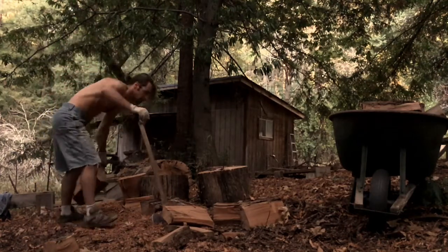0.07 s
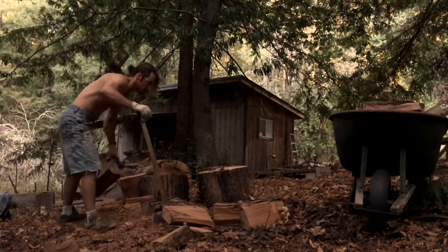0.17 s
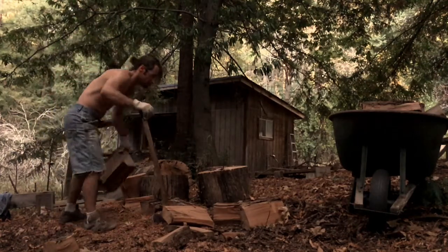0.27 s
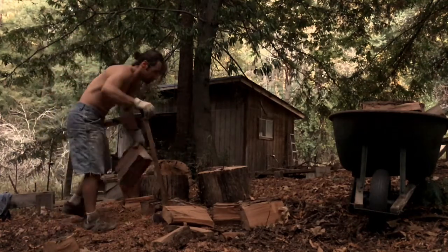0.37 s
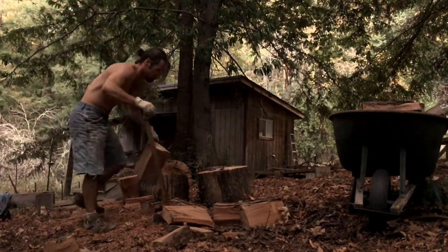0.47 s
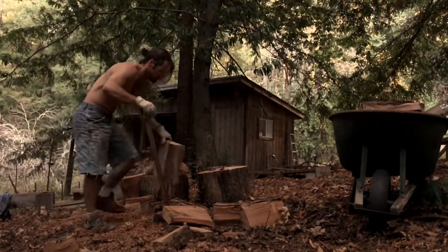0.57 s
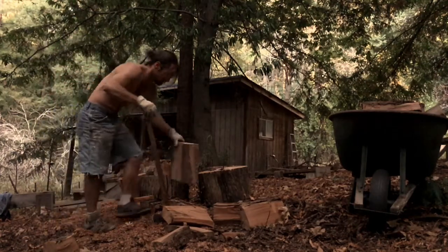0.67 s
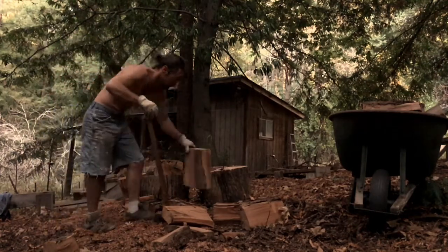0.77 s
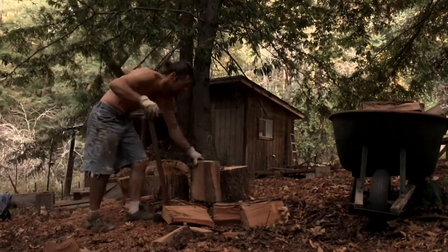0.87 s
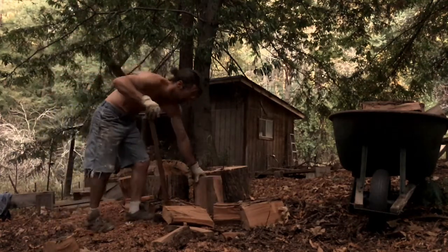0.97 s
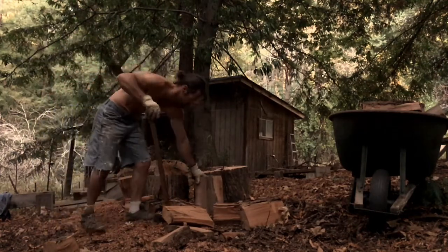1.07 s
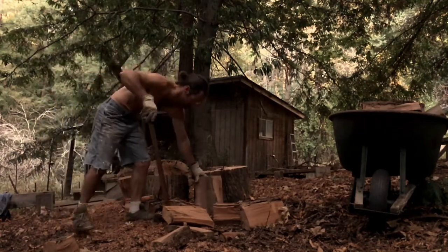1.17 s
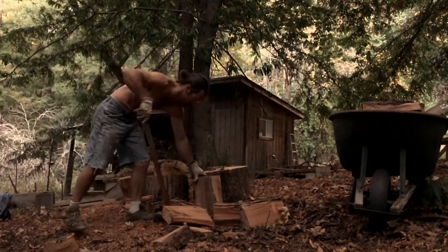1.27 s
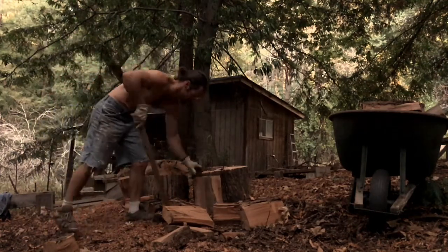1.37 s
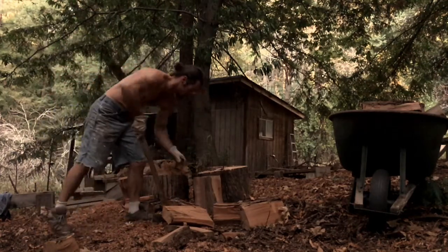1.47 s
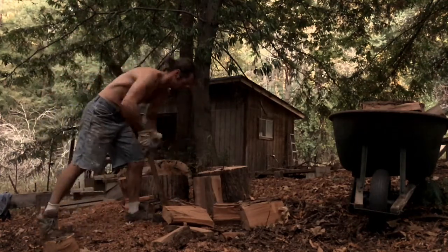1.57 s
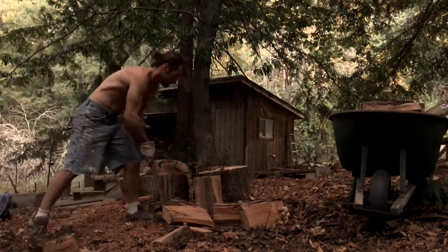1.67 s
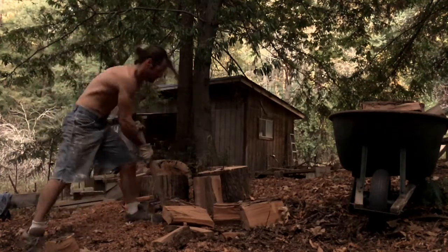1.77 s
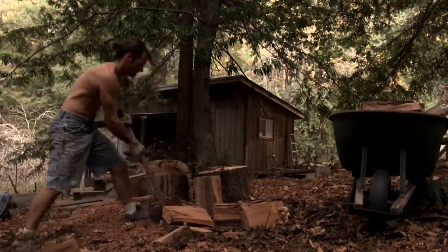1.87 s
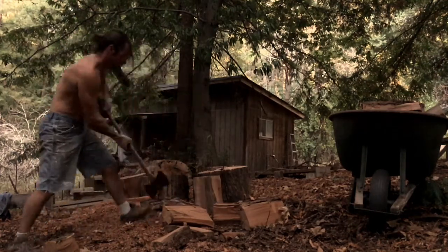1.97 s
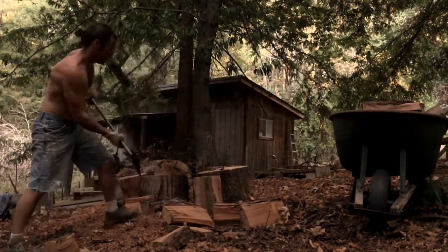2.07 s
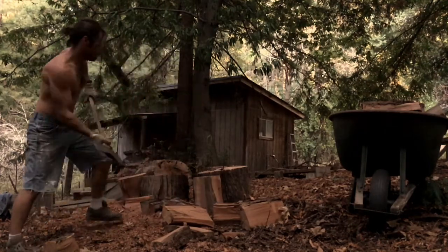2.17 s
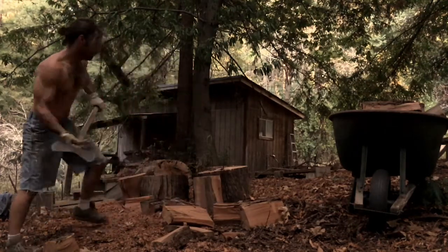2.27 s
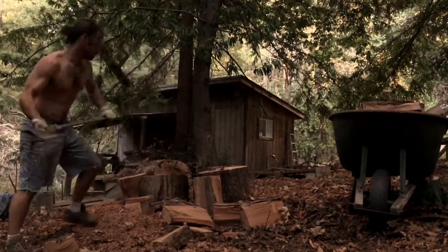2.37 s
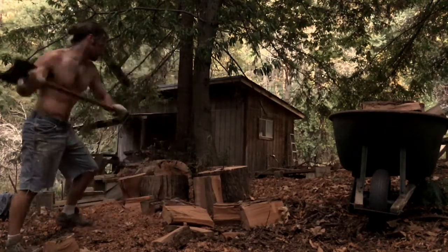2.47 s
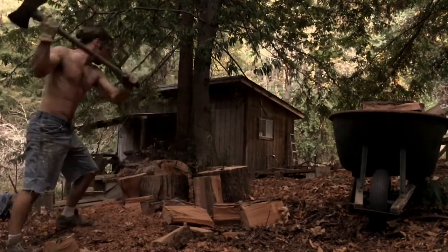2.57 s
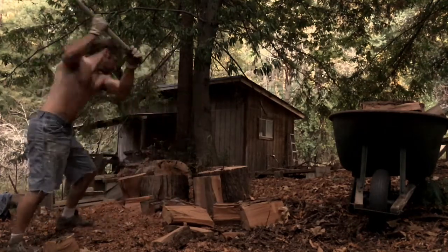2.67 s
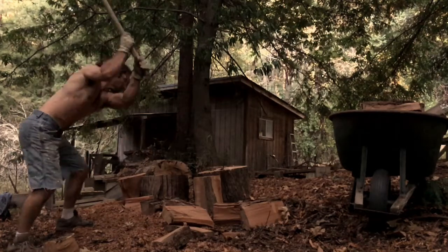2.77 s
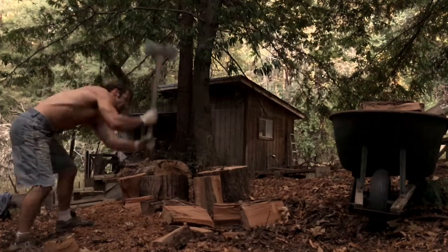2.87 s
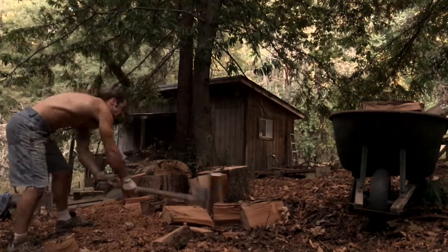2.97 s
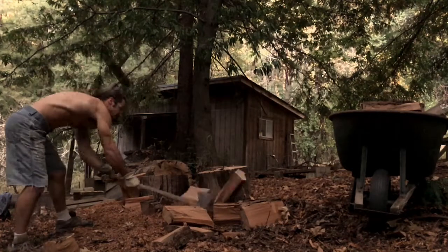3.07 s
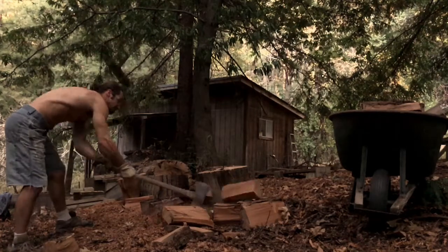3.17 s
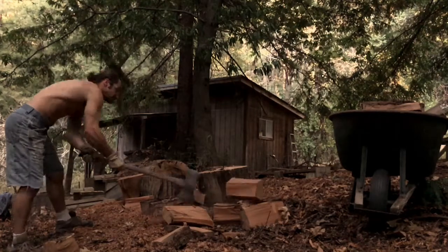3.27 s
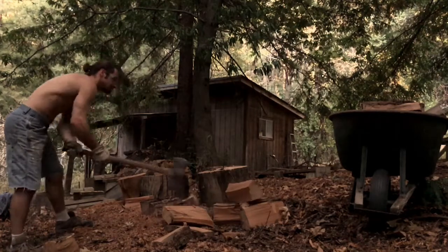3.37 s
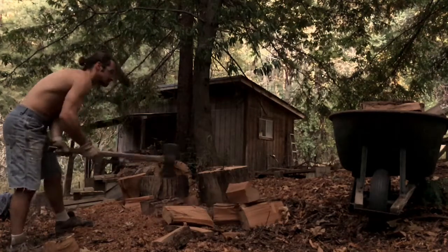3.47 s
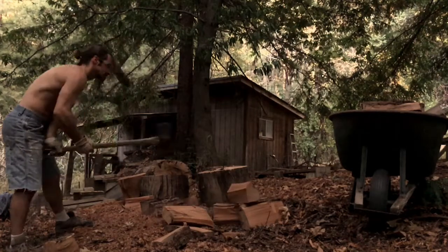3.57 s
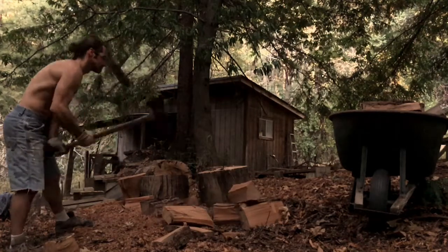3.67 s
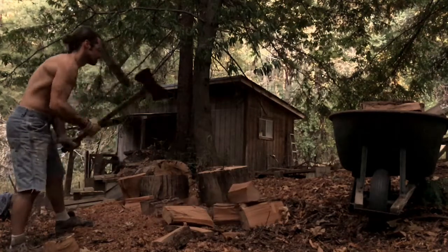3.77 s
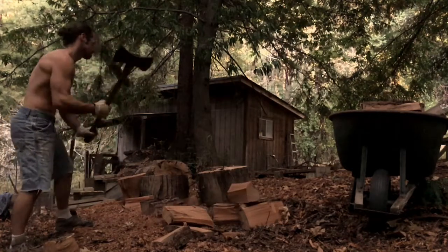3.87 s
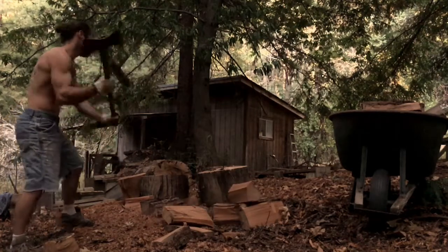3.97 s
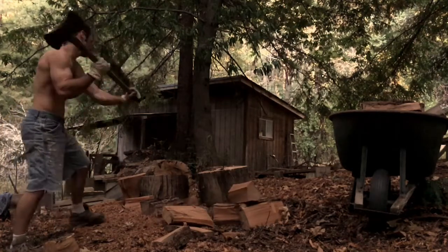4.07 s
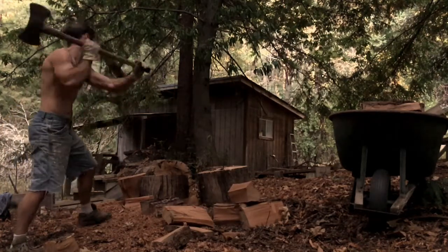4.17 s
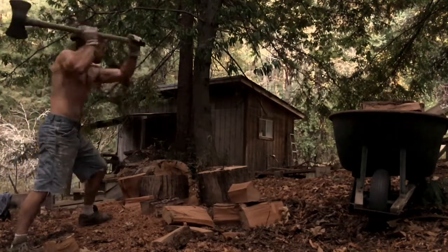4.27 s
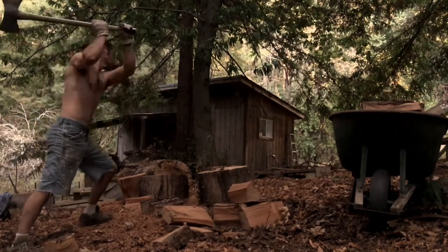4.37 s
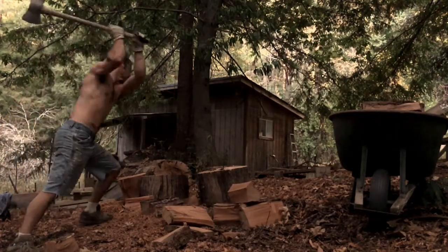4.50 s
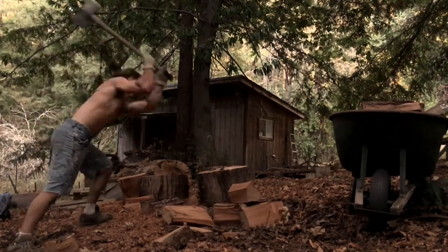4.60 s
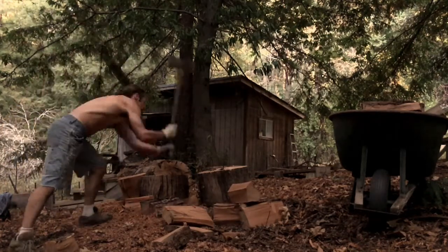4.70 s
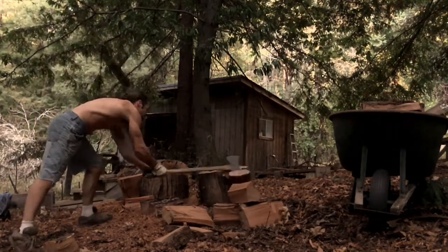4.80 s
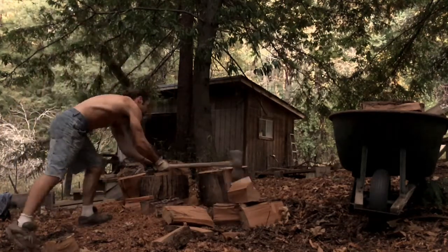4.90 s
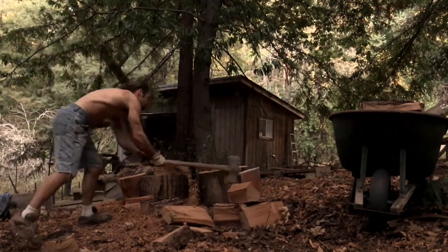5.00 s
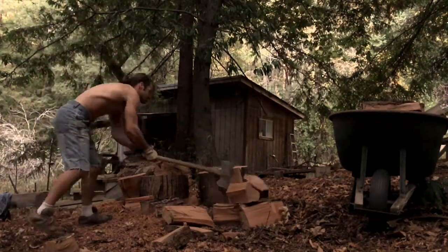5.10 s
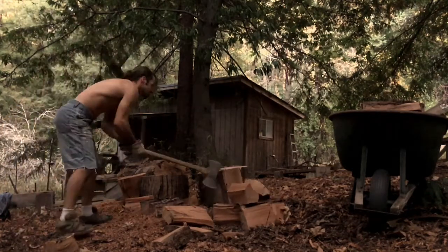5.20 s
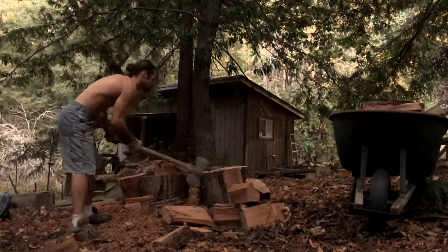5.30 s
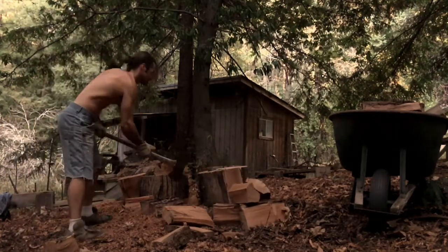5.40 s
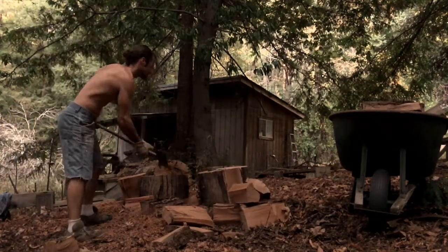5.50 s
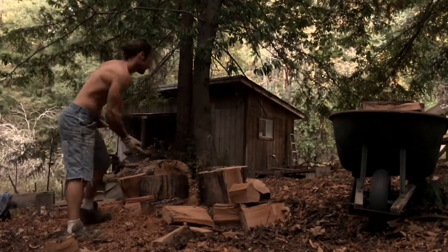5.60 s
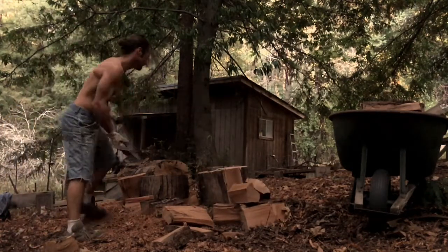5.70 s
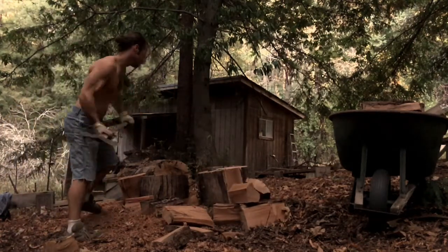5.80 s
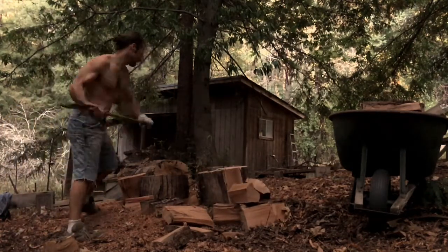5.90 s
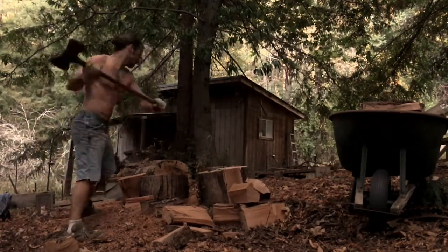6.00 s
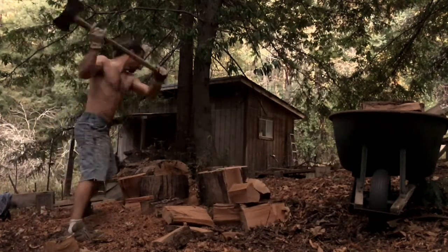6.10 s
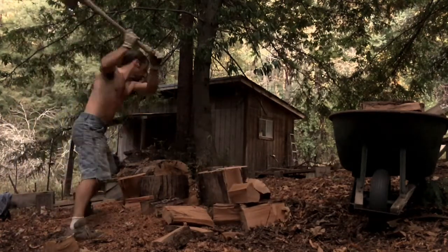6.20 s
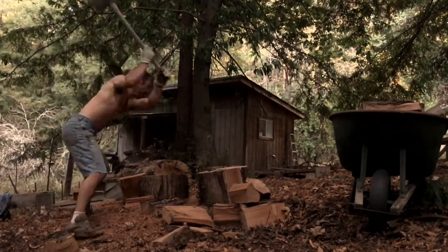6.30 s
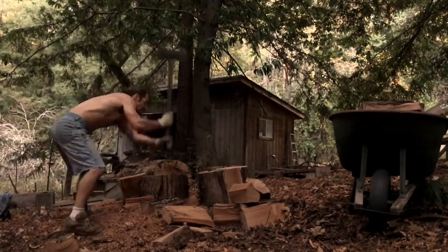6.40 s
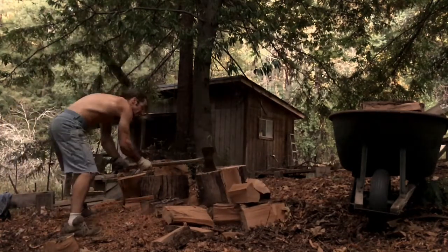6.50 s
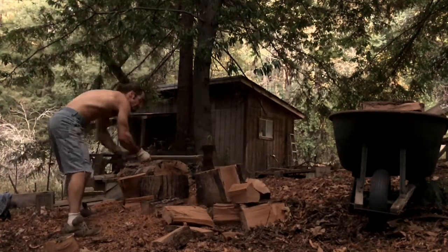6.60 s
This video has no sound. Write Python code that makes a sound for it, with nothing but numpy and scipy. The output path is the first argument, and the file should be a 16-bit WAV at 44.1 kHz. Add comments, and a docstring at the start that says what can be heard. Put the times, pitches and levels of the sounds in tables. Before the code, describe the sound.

Three cracking axe blows on wood echo through a forest, amid tumbling split pieces, brief steel rings and footsteps in leaves.

```python
"""Splitting firewood in the woods

An axe at a chopping block, on one microphone. Each of three chops swishes, cracks the log and thumps
the ground; the first two ring the steel head, and a shed throws that ring back. Split pieces fall and
knock, feet and logs rustle dry leaves, and the wood echoes off nearby trees and a far slope.
Far off, a bird hoots over a low, steady rumble."""
import sys
import numpy as np
from scipy import signal
from scipy.fft import rfft, irfft, next_fast_len
from scipy.io import wavfile
from scipy.ndimage import uniform_filter1d, map_coordinates

SR = 44100
rng = np.random.default_rng(int(sys.argv[2]) if len(sys.argv) > 2 else 0)


def store_wav(level_fs):
    """Save 16-bit WAV to argv[1]."""
    pcm = np.round(np.clip(np.atleast_2d(level_fs), -1, 1) * 32767)
    wavfile.write(sys.argv[1], SR, pcm.T.astype(np.int16))


N = 293265


def amp(db):
    """Decibels to gain."""
    return 10 ** (np.asarray(db) / 20)


def unit(x):
    """Scale to rms 1."""
    return x / np.sqrt(np.mean(x ** 2) + 1e-20)


def along(points, hz, column=1):
    """Read one column of (Hz, value, ..) points along a log frequency axis."""
    cols = np.transpose(points)
    return np.interp(np.log(hz + 1), np.log(cols[0] + 1), cols[column])


def curves(rows):
    """One value per sample for each column after the time."""
    times, *cols = np.transpose(rows)
    return [np.interp(np.arange(N) / SR, times, col) for col in cols]


def filtered(x, response):
    """Filter x by a response given as a function of frequency."""
    size = next_fast_len(N + SR // 2)
    return irfft(rfft(x, size) * response(np.fft.rfftfreq(size, 1 / SR)), size)[:N]


def coloured(x, response):
    """Filter scaled so that white noise keeps its rms."""
    hz = np.linspace(0, SR / 2, num=4096)
    return filtered(x, response) / np.sqrt(np.mean(np.abs(response(hz)) ** 2))


def shape(points):
    """Response through (Hz, dB) points."""
    return lambda hz: amp(along(points, hz))


def modes(table):
    """Causal response of a set of resonances, alternating in sign."""
    return lambda hz: sum((-1) ** k * amp(db) * 1j * hz * width / (centre**2 - hz**2 + 1j * hz * width)
                          for k, (centre, width, db) in enumerate(table))


def add(track, start, sound):
    """Mix a sound in at a start time in seconds."""
    part = track[round(start * SR):][:len(sound)]
    part += sound[:len(part)]


def fading(t, t60, rise):
    """Quick rise, then exponential decay."""
    return amp(-60 * t / t60) * (1 - np.exp(-t / rise))


def swell(peak_s, hold, rise, fall):
    """Gain that climbs to 1 at peak_s, holds and sinks; rise and fall are seconds per 30 dB."""
    now = np.arange(N) / SR
    return amp(-30 * np.maximum(0, np.maximum((peak_s - now) / rise, (now - peak_s - hold) / fall)))


def grainy(share, spread_db, clump_db):
    """Noise with sparse spikes of uneven size, coming in clumps; rms 1."""
    chance, size = rng.random((2, N))
    spikes = (chance < share) * amp(np.minimum(-spread_db * np.log(1 - size), 14))
    knots = rng.standard_normal(N // 1000 + 4)  # 23 ms apart
    clumps = amp(clump_db * map_coordinates(knots, [np.arange(N) / 1000]))
    return unit(clumps * (1 + 8 * uniform_filter1d(spikes, size=20)) * rng.standard_normal(N))


def wood_knocks():
    """At each contact fibres tear, the log resonates with two notes and a soft push moves the block."""
    # Blows and falling pieces. Each row: start in seconds, crack in dB, pitch of the piece in Hz,
    # then low note, high note and block in dB. Levels are relative within a column.
    contacts = [(0.796, -26.5, 1220, -77, -70, -77), (0.8716, -44, 550, -54, -62, -61),
                (1.028, -47, 1030, -51, -55, -76), (1.039, -29, 1155, -40, -46.5, -56),
                (1.0442, -29, 1060, -41, -50, -55), (1.0491, -31, 1150, -66, -59, -56),
                (1.193, -46.5, 1060, -76, -65, -84), (1.4282, -67, 850, -65, -67, -74),
                (1.459, -64, 955, -57, -74, -80), (1.796, -38, 1080, -64, -56, -81),
                (1.9524, -56, 560, -57, -74, -60), (2.0614, -51, 910, -55.5, -73, -63),
                (2.0874, -45, 880, -58.5, -68, -63), (2.1304, -62, 1090, -53, -83, -87),
                (2.568, -50, 1470, -65, -64.5, -73), (2.92, -62, 890.6, -58, -61, -64.5),
                (3.0398, 1, 1056, -8, -16, -22), (3.0434, -4.5, 1064, -19.5, -15.5, -36.5),
                (3.0509, -25, 1300, -32.5, -18.5, -26), (3.0634, -18, 1400, -19.5, -26, -20),
                (3.0694, -4.5, 1296, -10.5, -9.5, -19), (3.093, -24, 1100, -36.5, -40, -29),
                (3.1974, -32.5, 1320, -65, -63, -43), (3.2376, -24, 970, -32, -31.5, -37.5),
                (3.2469, -23.5, 1360, -25.5, -29, -39), (3.3308, -41, 1020, -46, -37.5, -75),
                (3.34, -32, 1180, -48, -31.5, -57), (3.349, -42, 1170, -42, -39, -57),
                (3.4739, -47, 627, -78, -69, -42), (4.176, -58.5, 1537, -77, -60, -75),
                (4.2659, -51, 1075, -73, -56.5, -79), (4.2885, -50, 1080, -70, -56, -80),
                (4.4516, -47, 968, -65, -55, -82), (4.461, -50, 964, -67, -57.5, -73.5),
                (4.574, -53.5, 1050, -65, -59.5, -71), (4.8681, -4.5, 692, -8.5, -18.5, -8.5),
                (4.871, -34, 330, -13, -16, -10.5), (4.878, -31, 850, -19.5, -35.5, -18),
                (4.8845, -9.5, 400, -13.5, -19, -18.5), (4.8862, -13, 1650, -29.5, -21, -28),
                (4.9442, -38.5, 950, -35.5, -37, -45), (5.1017, -14, 1330, -49, -31, -36),
                (5.2099, -11, 1287, -38.5, -20, -30.5), (5.2276, -27, 1160, -52, -32, -44),
                (5.2426, -33, 555, -40.5, -54, -41.5), (5.326, -28.5, 1480, -43, -58, -73.5),
                (5.337, -36, 1750, -73, -46, -72), (5.612, -63, 689, -52, -72, -59.5),
                (5.8325, -48, 681, -60.5, -63, -71), (6.575, -1, 1117, -12.5, -7, -11),
                (6.5779, -17, 1195, -34, -18, -21), (6.5849, -28, 637, -18.5, -41, -21)]
    # Spectrum of tearing fibres. Each row: frequency in Hz, gain in dB.
    fibre_spectrum = [(1470, -30), (2500, -11.5), (3430, -11), (4780, -4.5), (6920, -1), (9270, -4.5),
                      (10300, -9.5), (15200, -19), (16500, -36.5)]
    # Resonances of the log and the chopping block. Each row: centre in Hz, width in Hz, gain in dB.
    log_modes = [(845, 710, 1), (1124, 410, 6), (1629, 220, 1.5), (2140, 320, 3), (2540, 72, 2),
                 (3330, 500, -3)]
    block_modes = [(190.5, 130, -2), (245, 76, 3.5), (370, 53, 2), (670, 31, 4)]
    tear_t60, rebound_s, rebound_db = 0.013, 0.004, -12.5
    crack, knock, notes, push = np.zeros((4, N))
    t = np.arange(SR // 4) / SR
    tear = fading(t, tear_t60, rise=0.0032) + 0.6 * fading(t, 0.0035, rise=0.0009)  # a sharp snap leads
    drive = fading(t, 1.394 * tear_t60, rise=0.0011)
    shove = fading(t, t60=0.013, rise=0.00058)
    for start, crack_db, hz, low_db, high_db, block_db in contacts:
        for landing, gain in ((start, 1), (start + rebound_s, amp(rebound_db))):  # it lands twice
            crack_noise, log_noise = rng.standard_normal((2, len(t)))
            add(crack, landing, gain * amp(crack_db) * tear * crack_noise)
            add(knock, landing, gain * amp((low_db + high_db) / 2 + 8) * drive * log_noise)
            add(push, landing, -gain * amp(block_db + 20.5) * shove)
        low = amp(low_db + 7) * np.sin(2 * np.pi * hz * t)
        high = amp(high_db + 7) * np.sin(2 * np.pi * 1.9 * hz * t)
        add(notes, start, fading(t, tear_t60, rise=0.00072) * (low + high))
    log = coloured(crack, shape(fibre_spectrum)) + coloured(knock, modes(log_modes)) + notes
    return log + filtered(push, modes(block_modes))


def ground_thumps():
    """Under a blow or a falling log the soil swings a few times at a low pitch and is soon damped."""
    # Heaves of the ground. Each row: start in seconds, level in dB, pitch in Hz, length in seconds.
    heaves = [(1.055, -32, 125, 0.016), (1.071, -32.5, 77, 0.055), (1.748, -54, 68, 0.039),
              (3.044, -19.5, 115.7, 0.073), (3.056, -27, 70.2, 0.11), (3.252, -39.5, 61.5, 0.06),
              (3.481, -37, 71.6, 0.048), (4.859, -31, 116, 0.028), (4.892, -31.5, 68, 0.076),
              (5.016, -39, 77.4, 0.045), (5.223, -42, 73, 0.092), (6.575, -5.5, 125, 0.016),
              (6.58, -18.5, 70.4, 0.048)]
    out, t = np.zeros(N), np.arange(SR // 2) / SR
    for start, db, hz, length in heaves:
        envelope = (1 - np.exp(-t / 0.0024)) * np.exp(-3 * (t / length) ** 2)
        add(out, start, amp(db) * envelope * np.sin(2 * np.pi * hz * t))
    return out


def axe_head():
    """The struck steel head rings in four short modes and two long ones."""
    # Short modes of the steel. Each row: pitch in Hz, t60 in seconds.
    short_modes = [(2056, 0.21), (5238, 0.83), (6755, 0.049), (7775, 0.048)]
    # Blows on the head. Each row: start in seconds, then the level of each short mode in dB.
    blows = [(3.07, -67.5, -78.5, -22.5, -19.5), (4.870, -22.5, -46.5, -43.5, -40)]
    # Long modes, of the first chop and the second. Each row: time in seconds, direct rms level in dB.
    high_ring = [(3.077, -33), (3.095, -33.5), (3.15, -38.5), (3.2, -52), (3.3, -53), (3.42, -79)]
    low_ring = [(4.885, -36), (4.9, -32.5), (4.96, -44.5), (5.19, -44.5), (5.519, -58), (5.6, -68.5),
                (5.8, -70.5), (5.96, -75.5), (6.3, -86)]
    out, t = np.zeros(N), np.arange(SR // 2) / SR
    for start, *levels_db in blows:
        for (hz, t60), db in zip(short_modes, levels_db):
            add(out, start, amp(db) * fading(t, t60, rise=0.0027) * np.sin(2 * np.pi * hz * t))
    return out + moving_ring(high_ring, hz=4795) + moving_ring(low_ring, hz=2436)


def moving_ring(levels, hz):
    """A long mode and its echo off the shed shift in pitch and beat as the head is drawn back."""
    # Travel of the head. Each row: time in seconds, approach to the microphone in metres,
    # extra path of the echo in metres.
    head_path = [(3.095, 0, 0), (3.15, 0, .036), (3.195, 0, .107), (3.27, 0, .179), (3.42, 0, .29),
                 (4.87, 0, .282), (5.19, 0, .634), (5.27, .03, .775), (5.405, .13, 1.057),
                 (5.485, .2, 1.198), (5.54, .29, 1.339), (5.575, .35, 1.48), (5.69, .35, 1.621),
                 (5.86, .4, 1.762), (5.96, .3, 1.903), (6.3, -.5, 2.25)]
    sound_m_per_s, shed_gain = 343, 0.65
    now = np.arange(N) / SR
    first, last = levels[0][0], levels[-1][0]
    gate = np.interp(now, [first - 0.005, first, last, last + 0.05], [0, 1, 1, 0])
    nearer_m, extra_m = curves(head_path)
    direct = np.sin(2 * np.pi * hz * (now + nearer_m / sound_m_per_s))
    echo = np.sin(2 * np.pi * hz * (now + (nearer_m - extra_m) / sound_m_per_s))
    return np.sqrt(2) * gate * amp(curves(levels)[0]) * (direct + shed_gain * echo)


def swish():
    """Air rushes ever louder round the falling head and stops at the blow."""
    # The moment of each chop in seconds.
    chop_times = [3.04, 4.868, 6.575]
    # Spectrum of the rushing air. Each row: frequency in Hz, gain in dB.
    rush_spectrum = [(150, -29.5), (400, 3), (1500, -7), (4000, -12.5), (9000, -12), (16000, -30)]
    rush = sum(swell(chop, hold=0, rise=0.2, fall=0.01) for chop in chop_times)
    return amp(-56) * coloured(rush * rng.standard_normal(N), shape(rush_spectrum))


def leaf_litter():
    """Dry litter crunches under feet, logs and chips; single twigs, leaves and splinters snap."""
    # Stirs of the litter. Each row: peak time, hold, rise and fall in seconds,
    # then relative crisp and dull levels in dB.
    rustles = [(0.0, .01, .01, 0.16, -72.5, -76.5), (0.245, 0.026, 0.12, 0.062, -53, -69),
               (0.33, 0.18, 0.16, .5, -68.5, -80.5), (0.792, 0.025, 0.027, 0.15, -51, -63.5),
               (0.93, 0.0076, 0.034, 0.16, -64, -67.5), (1.04, 0.0067, 0.047, 0.38, -60.5, -66),
               (1.55, 0.2, 0.9, .3, -76, -76.5), (1.81, 0.13, 0.025, 0.44, -60, -66.5),
               (2.045, .12, .2, 0.24, -63, -67.5), (2.32, 0.015, 0.054, 0.22, -72, -72.5),
               (2.26, 0.0054, .15, 0.08, -63.5, -74), (2.5, 0.43, 0.062, 0.14, -66, -75),
               (2.916, 0.012, 0.14, 0.1, -64, -68.5), (3.09, 0.0073, .02, 0.11, -47, -49),
               (3.23, 0.25, 0.64, 0.25, -56.5, -58), (3.6, 0.17, .1, 0.11, -71, -72.5),
               (4.01, 0.012, 0.25, 0.09, -64.5, -71), (4.271, 0.046, 0.15, 0.12, -71, -74),
               (4.357, 0.082, 0.11, 0.11, -69, -76.5), (4.457, 0.037, 0.042, 0.12, -75, -73),
               (4.547, .05, 0.047, 0.24, -79.5, -75), (4.785, .05, 0.15, 0.12, -71, -76),
               (4.89, 0.005, .02, 0.074, -43.5, -44), (5.018, 0.0066, 0.17, 0.27, -51.5, -54),
               (5.1, 0.17, 0.16, 0.19, -76, -58.5), (5.33, 0.0078, .6, 0.38, -53, -61.5),
               (5.467, 0.14, 0.21, 0.34, -61.5, -70.5), (5.72, 0.16, .1, 0.13, -73, -77.5),
               (6.044, .01, 0.17, 0.59, -65, -70), (6.22, .01, 0.048, 1.04, -66, -79.5),
               (6.4, 0.14, .1, 0.24, -66.5, -78), (6.561, 0.037, 0.025, .15, -54, -48.5)]
    # Single snaps. Each row: start in seconds, relative level in dB, t60 in seconds.
    snaps = [(0.2234, -36, 0.0096), (0.2497, -28, 0.0067), (0.2798, -17.5, 0.003), (0.2994, -44, 0.0082),
             (0.4543, -31.5, 0.0045), (0.7712, -44, 0.025), (0.9223, -47, 0.012), (2.33, -45, .01),
             (2.4503, -51, 0.025), (3.2055, -34, 0.0086), (3.219, -34, 0.049), (3.356, -35, 0.016),
             (3.549, -31.5, 0.0062), (3.685, -43, 0.01), (3.81, -49.5, .008), (3.999, -49, .006),
             (4.305, -49, .008), (4.473, -47, .006), (4.8685, -0.5, 0.0074), (4.8843, -17, .008),
             (4.9655, -26, 0.011), (5.008, -32, 0.048), (5.036, -42, 0.016), (5.103, -27, 0.0058),
             (5.391, -32, 0.012), (5.4044, -30.5, 0.0061), (5.5572, -47.5, 0.026)]
    # Spectra of the crisp and the dull crunch. Each row: frequency in Hz, gain in dB.
    crisp_spectrum = [(1470, -21), (2500, -13), (4180, -7), (6760, 0.5), (10600, -6), (11800, -6),
                      (15500, -16), (16100, -18), (16500, -31)]
    dull_spectrum = [(150, -32.5), (250, -3), (323, -5.5), (462, -8.5), (1140, -5), (2890, -11),
                     (4000, -14.5), (5200, -47.5), (8800, -120)]
    crisp_power, dull_power = sum((swell(*row[:4]) * amp(row[4:])[:, None]) ** 2 for row in rustles)
    crisp = np.sqrt(crisp_power) * grainy(share=0.009, spread_db=5.5, clump_db=1.5)
    t = np.arange(SR // 10) / SR
    for start, db, t60 in snaps:
        add(crisp, start, amp(db - 5.5) * fading(t, t60, rise=0.00042) * rng.standard_normal(len(t)))
    dull = amp(2.5) * np.sqrt(dull_power) * grainy(share=0.0086, spread_db=1.5, clump_db=3.0)
    return coloured(crisp, shape(crisp_spectrum)) + coloured(dull, shape(dull_spectrum))


def trunk_scatter(x, bands, delay_frames):
    """Trunks scatter sound back as noise: each band's power arrives late and dies at its own speed."""
    framing = dict(fs=SR, nperseg=256, noverlap=192)  # frames 1.45 ms apart
    hz, times, spectrum = signal.stft(x, **framing)
    band_gain = amp(along(bands, hz, column=2))
    power = uniform_filter1d(np.abs(spectrum) ** 2, size=3, axis=0) * band_gain[:, None] ** 2
    kept_per_frame = amp(-120 * times[1] / along(bands, hz))
    tail = np.array([signal.lfilter([*np.zeros(delay_frames), 1 - kept], [1, -kept], band)
                     for kept, band in zip(kept_per_frame, power)])
    noise = signal.stft(rng.standard_normal(N), **framing)[2]
    noise /= np.sqrt(np.mean(np.abs(noise) ** 2))
    return signal.istft(np.sqrt(np.abs(tail)) * noise, **framing)[1][:N]


def forest_echo(x):
    """The nearby trees answer almost at once, the far slope later."""
    # Echoes of the trees and the slope. Each row: frequency in Hz, t60 in seconds, relative gain in dB.
    near_trees = [(60, .4, 2.5), (250, 0.1, -3.5), (800, 0.25, -0.5), (1490, 0.57, 0), (2310, 0.26, 4),
                  (3770, 0.55, -1), (7000, 0.23, 1.5), (14000, 0.31, -4)]
    far_slope = [(200, 0.63, -45.5), (509, 0.5, -14.5), (754, 1.9, -6.5), (1054, 0.76, -12),
                 (1490, 0.6, -11.5), (2520, 0.96, -9.5), (4036, .7, -23.5), (9000, 0.58, -41.5)]
    near = trunk_scatter(x, near_trees, delay_frames=3)
    far = trunk_scatter(x, far_slope, delay_frames=60)
    return amp(-17) * (near + far)


def far_bird():
    """Three soft, low hoots, far from the microphone."""
    # The bird's call. Each row: start in seconds, length in seconds, pitch in Hz, peak level in dB.
    hoots = [(1.095, .11, 688, -68), (1.332, 0.18, 696, -71), (1.622, 0.065, 683, -67)]
    out = np.zeros(N)
    for start, length, hz, db in hoots:
        t = np.arange(round(length * SR)) / SR
        add(out, start, amp(db) * np.sin(np.pi * t / length) * np.sin(2 * np.pi * hz * t))
    return out


def forest_air():
    """Steady rumble and faint hiss of the woods."""
    # Spectrum of the ambience. Each row: frequency in Hz, gain in dB.
    air_spectrum = [(13, -35), (22, -17), (68, 1.5), (130, -5), (259, -14), (361, -15.5), (450, -20.5),
                    (3220, -29), (3910, -31), (6260, -29), (8490, -29.5), (15200, -37.5), (16500, -51.5)]
    return amp(-63.5) * unit(filtered(rng.standard_normal(N), shape(air_spectrum)))


def scene():
    """The chopping and its echoes over litter, bird and air, in mono."""
    wood = wood_knocks()
    chopping = wood + forest_echo(wood) + ground_thumps() + axe_head() + swish()
    return (chopping + leaf_litter() + far_bird() + forest_air())[None]


def record(dry):
    """The recorder rounds off the loudest peaks and cuts the highest treble."""
    ceiling, rolloff_hz, cutoff_hz = 0.99, 15800, 17000
    saturated = dry[0] / (1 + np.abs(dry[0] / ceiling) ** 6) ** (1 / 6)
    return filtered(saturated, lambda hz: amp(-np.maximum(hz - rolloff_hz, 0) / 30) * (hz < cutoff_hz))[None]


dry = scene()
out = record(dry)
store_wav(out)
```